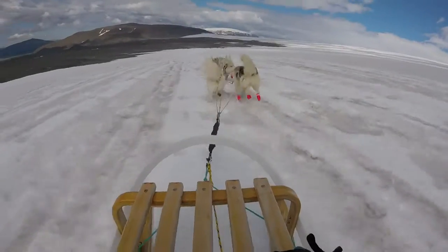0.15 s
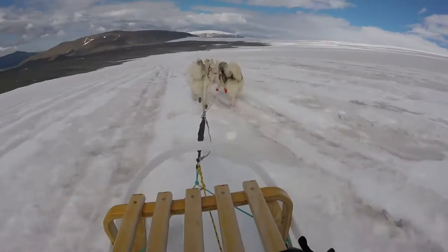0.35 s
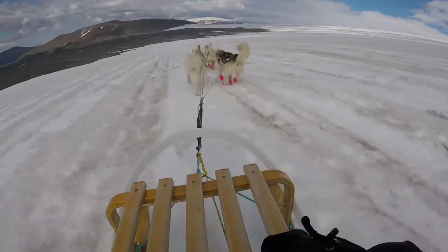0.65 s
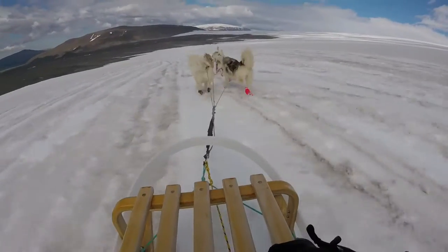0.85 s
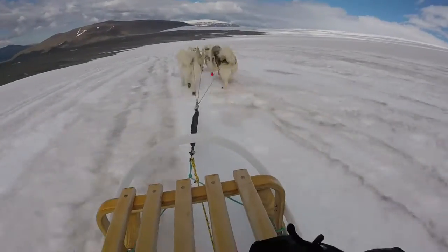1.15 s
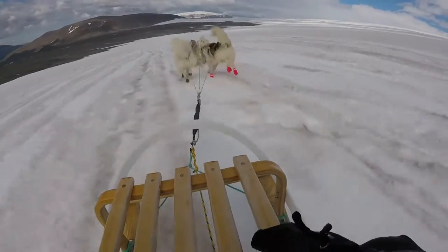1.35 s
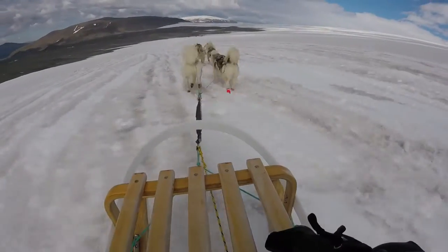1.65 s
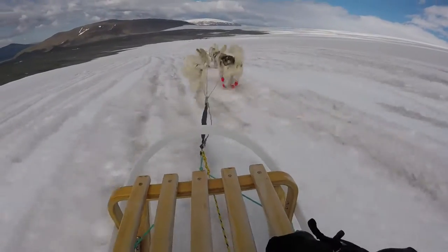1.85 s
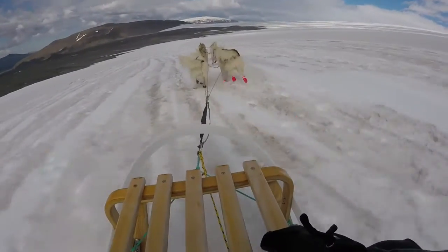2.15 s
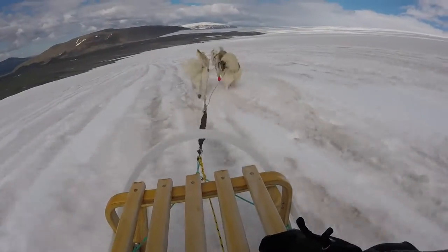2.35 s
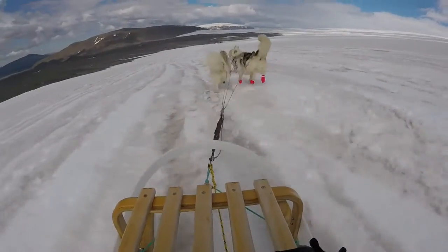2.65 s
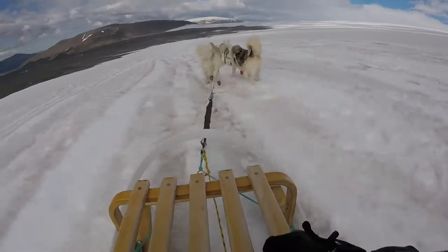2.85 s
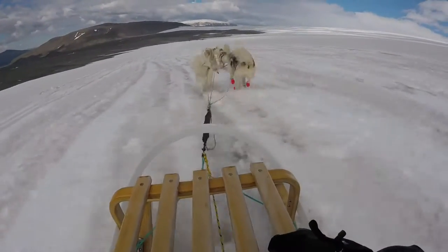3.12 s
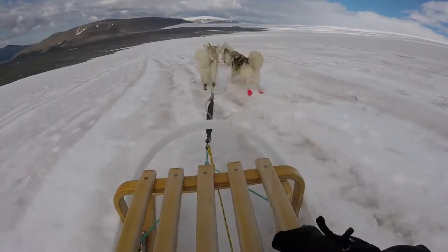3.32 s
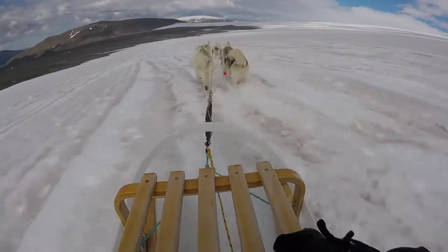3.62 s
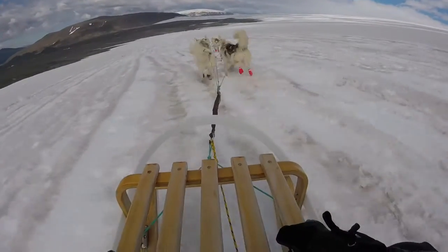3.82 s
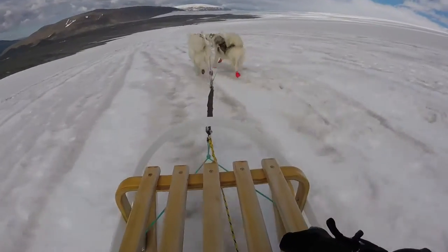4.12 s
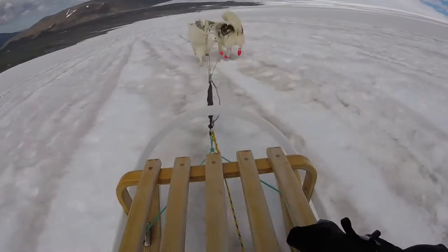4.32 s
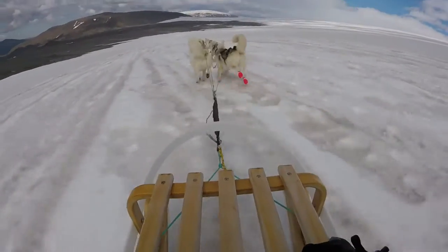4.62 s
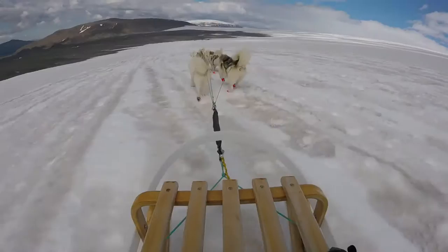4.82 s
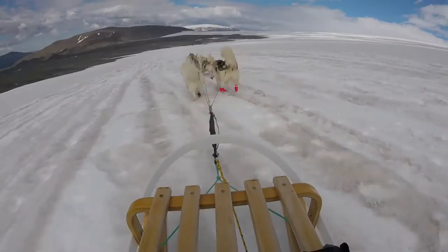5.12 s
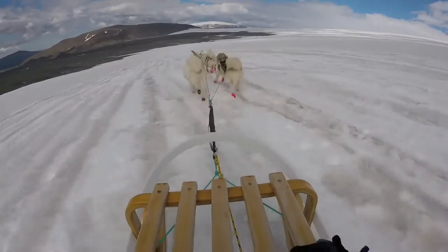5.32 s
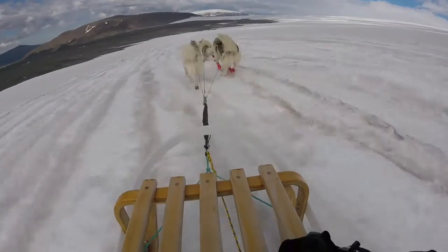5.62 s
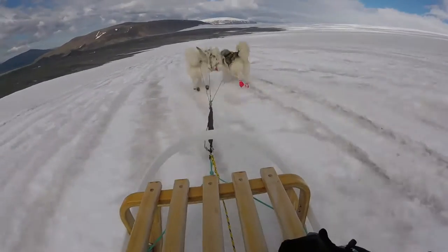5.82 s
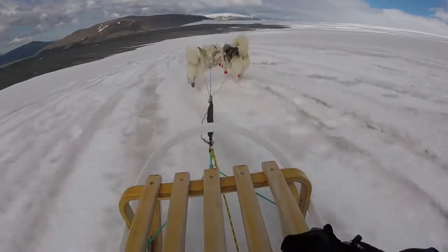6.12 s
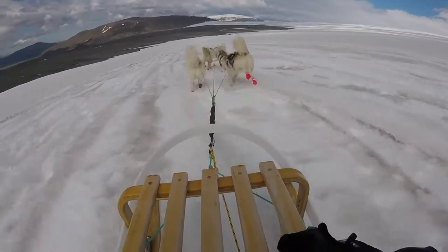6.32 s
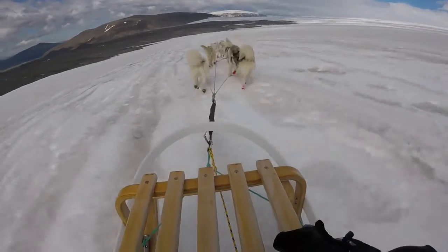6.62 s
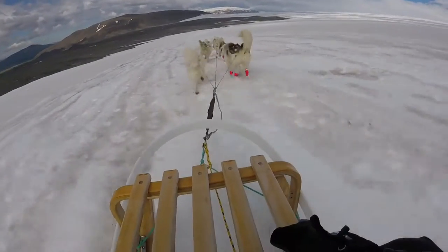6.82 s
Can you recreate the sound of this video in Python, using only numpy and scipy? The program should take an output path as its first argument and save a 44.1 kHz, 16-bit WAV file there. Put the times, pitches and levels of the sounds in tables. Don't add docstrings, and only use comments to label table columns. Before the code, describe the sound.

A wooden dog sled slides over packed, granular snow in the open. The scrape starts gritty and bright, drops softer almost at once, then returns in irregular swells with brief knocks of the frame. Low wind thumps flutter throughout, and small metal snaps on the tow line tick occasionally. A small enclosed camera microphone on the sled hears it all close, dry and slightly muffled.

```python
import sys
import numpy as np
from scipy import signal
from scipy.fft import rfft, irfft
from scipy.io import wavfile
from scipy.ndimage import uniform_filter1d

SR = 44100
rng = np.random.default_rng(int(sys.argv[2]) if len(sys.argv) > 2 else 0)


def voltage_ratio(level):
    return 10 ** (np.asarray(level, float) / 20)


def wav_out(sig):
    wavfile.write(sys.argv[1], SR, np.round(np.clip(np.atleast_2d(sig).T, -1, 1) * 32767).astype(np.int16))


N = 307377

# f/Hz, level/dB per Hz
EDDY_COLOUR = [(7.1, -27), (12, -0.5), (32, 1), (49, 1.5), (153, -11), (381, -23.5), (480, -28.5),
               (620, -34.5), (1060, -120)]
# t/s, level/dB
GUSTS = [(0.0, -15), (0.41, -12), (0.47, -17.5), (3.13, -14.5), (3.36, -20), (3.71, -18.5), (3.76, -16.5),
         (3.84, -20), (4.19, -19.5), (4.23, -17.5), (4.66, -15.5), (4.74, -13), (4.87, -18.5),
         (4.91, -12.5), (5.79, -13.5), (5.8, -19.5), (6.95, -16), (6.97, -23)]
# t/s, big eddy gain/dB, small eddy gain/dB, half length/s
PORT_BUFFETS = [(0.107, 10, 7.5, 0.011), (0.162, -2, -10, 0.024), (0.255, 1.5, 8, 0.025),
                (0.476, -9, 3, 0.0092), (0.72, -4, -5, 0.032), (0.78, 5, 5, 0.02), (0.859, -5, 4, 0.024),
                (0.956, -8, -6.5, 0.033), (1.218, 2.5, 6.5, .04), (1.34, -2.5, 1.5, 0.037),
                (1.38, 6, 2, 0.025), (1.607, -9, -1, 0.036), (1.645, 1, 6.5, 0.027), (2.464, 9, 0, 0.012),
                (3.37, -4, -7.5, 0.052), (3.772, 11, 4, 0.02), (4.02, -13, -1, .025),
                (4.066, 5.5, 1, 0.022), (4.246, 7, 2.5, .025), (4.365, 3, 5, 0.038), (4.71, 3.5, 4, 0.03),
                (4.866, -8, 6, 0.027), (4.975, 6, 4.5, 0.031), (5.5, -2, -3, 0.02), (5.635, 4, -0.5, 0.025),
                (5.749, 4, -7.5, 0.028), (6.395, 5.5, 3.5, 0.046), (6.582, 3, 9.5, 0.035),
                (6.77, -3, -5.5, 0.045), (6.87, 2.5, 2.5, .03)]
# t/s, peak level/dB, loudest ring f/Hz
METAL_SNAPS = [(0.2254, -39, 6720), (0.6469, -33, 6580), (1.046, -38, 9400), (1.0634, -35, 6900),
               (1.0706, -41, 6800), (1.8334, -43, 6580), (1.8422, -33, 8700), (1.8454, -34, 7070),
               (1.8574, -39, 8980), (1.8676, -42, 6720), (2.3794, -42, 6700), (3.5568, -39, 8200),
               (5.5822, -33.5, 8570), (5.5914, -46, 8830), (6.3894, -47, 6500)]
# f/Hz, level/dB, t60/s
METAL_MODES = [(6800, -12, .02), (8500, -4, 0.027), (10400, -7, 0.022), (11300, -11, .025),
               (13900, -9, .03)]
# f/Hz, level/dB per Hz
CASE_COLOUR = [(190, -19), (330, -8.5), (526, -3.5), (934, 0.5), (1080, -7.5), (1240, -8.5), (1360, -15.5),
               (1610, -21), (2400, -13), (2560, -14.5), (2910, -25), (3700, -16), (4210, -37), (4400, -44),
               (5720, -74), (9680, -120)]
# f/Hz, level/dB per Hz
PORT_COLOUR = [(2470, -40), (4200, -12), (4800, -7), (5650, 0), (7530, -10.5), (11900, -14), (15100, -16.5)]
# full contact t/s, grit level/dB, rise/dB per s, hold/s, fade/dB per s
ICE_PATCHES = [(0.0, -38.5, 200, 0.017, 70), (0.41, -53.5, 74, .08, 40), (0.528, -47, 272, 0.23, 38),
               (1.22, -54, 67, .01, 83), (1.292, -45, 200, 0.082, 31), (1.368, -36.5, 64.5, 0.12, 30.5),
               (1.845, -54.5, 97, 0.059, 25), (2.09, -45, 128, 0.25, 45), (2.597, -55, 66, .03, 35),
               (2.746, -45, 230, 0.068, 37), (2.86, -43, 100, 0.25, 43), (3.15, -40.5, 56, 0.093, 49),
               (3.73, -49.5, 43, .02, 43), (3.9, -46, 37, .02, 32), (4.243, -44, 900, 0.096, 42),
               (4.318, -41.5, 200, 0.035, 30), (4.433, -39, 200, .37, 32), (5.153, -41, 98, 0.017, 41),
               (5.674, -43, 137, 0.24, 26), (6.17, -41.5, 33, 0.0091, 83), (6.545, -48.5, 20, 0.026, 62),
               (6.766, -52, 68, 0.1, 40), (6.97, -46.5, 60, .01, 40)]
# t/s, gain/dB, time to die away/s
FRAME_JOLTS = [(0.52, -1.5, 0.044), (0.65, -2, 0.056), (0.754, 7, 0.016), (1.234, 3, 0.051),
               (1.39, 10, 0.026), (1.45, 3.5, 0.29), (1.791, 3.5, 0.16), (1.99, 1.5, .04),
               (2.08, -1, 0.017), (2.13, 5, 0.017), (2.214, -4, 0.02), (2.77, 4.5, 0.055), (3.06, 6, 0.025),
               (3.117, 4, .015), (3.17, 5.5, 0.12), (3.49, 7, 0.065), (3.655, 9, 0.029), (3.76, 7, .06),
               (3.93, 5.5, 0.032), (4.12, 1, .02), (4.26, 2, 0.021), (4.321, 10, 0.019), (4.68, 3, .05),
               (4.8, 2, .1), (5.29, 4.5, 0.065), (5.73, 5, 0.041), (6.065, 10, .04), (6.45, 5.5, 0.024),
               (6.57, 5.5, 0.084), (6.88, 2, .05)]
# t/s, gain/dB, time to die away/s
ICE_SPRAY = [(0.36, 5, .1), (1.04, 5, .03), (1.23, 0, .04), (1.83, -10, 0.045), (2.05, -2, .05),
             (2.25, 4, .15), (2.72, -2, .04), (3.0, -1, .1), (3.36, 3, .06), (3.77, 1, .05),
             (4.238, 2.5, 0.35), (4.55, 0.5, .2), (5.575, 0, .03), (5.62, 6, .1), (5.85, 0, .1),
             (6.12, 1, .08), (6.38, 3, 0.065), (6.87, 5, .06)]

TYPICAL_GRIT_DB = -46


def slow_time():
    return np.arange(0, N / SR + 0.002, 0.001)


def per_sample(control):
    return np.interp(np.arange(N) / SR, slow_time(), control)


def unit(x):
    return x / np.sqrt(np.mean(x ** 2))


def smooth_twice(x, k):
    return uniform_filter1d(uniform_filter1d(x, k), k)


def walk(rate_hz):
    hold = int(SR / rate_hz)
    steps = np.repeat(rng.standard_normal(N // hold + 1), hold)
    return 1.3 * smooth_twice(steps, hold)[:N]


def steady(x, span_s, share):
    x = unit(x)
    power = smooth_twice(x ** 2, int(span_s * SR))
    return unit(x / power ** (share / 2))


def bands(x, colour, peaks_hz):
    log_hz = np.log(np.maximum(np.arange(N // 2 + 1) * SR / N, 1))
    hz, db = np.array(colour).T
    spectrum = rfft(x) * voltage_ratio(np.interp(log_hz, np.log(hz), db, left=-90, right=-90))
    split = []
    for one_peak in np.eye(len(peaks_hz)):
        weight = np.interp(log_hz, np.log(peaks_hz), one_peak)
        split.append(irfft(spectrum * weight, N))
    return np.array(split)


def sudden_gain(events):
    t, rise_s = slow_time(), 0.0022
    gain_db = np.zeros(len(t))
    for start, db, fall_s in events:
        since = np.maximum(t - start, 0)
        gain_db += db * (1 - np.exp(-since / rise_s)) * np.exp(-since / fall_s)
    return per_sample(gain_db)


def eddy_levels(grit_db):
    t = slow_time()
    gust_s, gust_db = np.transpose(GUSTS)
    big_db = np.interp(t, gust_s, gust_db)
    small_db = -22 + 0.75 * (big_db - big_db.mean()) + 0.26 * (grit_db - TYPICAL_GRIT_DB)
    for s, big_gain, small_gain, half_s in PORT_BUFFETS:
        swell = np.exp(-((t - s) / half_s) ** 2)
        big_db = big_db + big_gain * swell
        small_db = small_db + small_gain * swell
    return per_sample(big_db), per_sample(small_db)


def wind(grit_db):
    big_db, small_db = eddy_levels(grit_db)
    sizes = bands(rng.standard_normal(N), EDDY_COLOUR, [20, 40, 80, 130, 220, 400])
    big = steady(sizes[:3].sum(0), 0.055, 0.63)
    shared_flutter = walk(18)
    small = np.zeros(N)
    for eddy in sizes[3:]:
        small += eddy * voltage_ratio(1.25 * shared_flutter + 1.28 * walk(21.96))
    return voltage_ratio(big_db + 0.2) * big + voltage_ratio(small_db - 1.11) * steady(small, 0.16, 0.5)


def tow_line_snaps():
    length = 4096
    out, t = np.zeros(N + length), np.arange(length) / SR
    for s, db, ring_hz in METAL_SNAPS:
        chance = rng.standard_normal((2, len(METAL_MODES)))
        ring = np.sin(2 * np.pi * ring_hz * t) * voltage_ratio(-0.5 - 60 * t / 0.044)
        for (hz, mode_db, t60), detune, balance in zip(METAL_MODES, *chance):
            mode = np.sin(2 * np.pi * hz * (1 + 0.03 * detune) * t)
            ring += mode * voltage_ratio(mode_db + 4 * balance - 60 * t / t60)
        rattle = np.diff(rng.standard_normal(length + 2), 2) * voltage_ratio(-14 - 60 * t / 0.055)
        start = int(s * SR)
        out[start:start + length] += voltage_ratio(db - 6) * (ring + rattle)
    return out[:N]


def grit_level():
    t, powder_db = slow_time(), -71
    power = voltage_ratio(powder_db) ** 2
    for s, db, rise, hold, fade in ICE_PATCHES:
        before, after = np.maximum(s - t, 0), np.maximum(t - s - hold, 0)
        power = power + voltage_ratio(db - rise * before - fade * after) ** 2
    return 10 * np.log10(power)


def snow_scrape():
    crystals_per_s = 9000
    size = voltage_ratio(-2.1 * np.log(1 - rng.random(N)))
    sign = np.sign(rng.random(N) - 0.5)
    breaks = rng.random(N) < crystals_per_s / SR
    return unit(size * sign * breaks) + 0.94 * rng.standard_normal(N)


def runners(grit_db):
    hard_db = grit_db - TYPICAL_GRIT_DB
    jolt_db = sudden_gain(FRAME_JOLTS)
    scrape = snow_scrape()
    low = bands(scrape, CASE_COLOUR, [450, 1000, 1400, 2300, 3600])
    high = bands(scrape, PORT_COLOUR, [4600, 5600, 7500, 9500, 13000])
    judder = walk(40)

    def shaken(group):
        return unit(sum(band * voltage_ratio(0.64 * judder + 1.3 * walk(15)) for band in group))

    frame, crust = shaken(low[:2]), shaken(low[2:])
    grit, sparkle = shaken(high[:3]), shaken(high[3:])
    frame_db = -28.5 + 0.52 * hard_db + jolt_db
    crust_db = -38.5 + 0.73 * hard_db + 0.25 * jolt_db
    sparkle_db = -54.5 + 0.9 * hard_db + sudden_gain(ICE_SPRAY)
    snow = voltage_ratio(crust_db) * crust + voltage_ratio(grit_db) * grit + voltage_ratio(sparkle_db) * sparkle
    return snow + voltage_ratio(frame_db) * steady(frame, 0.053, 0.33)


def scene():
    grit_db = grit_level()
    mix = wind(grit_db) + tow_line_snaps() + runners(per_sample(grit_db))
    return mix[None]


def low_pass(x):
    return signal.sosfilt(signal.butter(12, 15150, fs=SR, output="sos"), x)


def record(dry):
    mix = 0.95 * np.tanh(dry / 0.98)
    return low_pass(mix)


dry = scene()
out = record(dry)
wav_out(out)
```